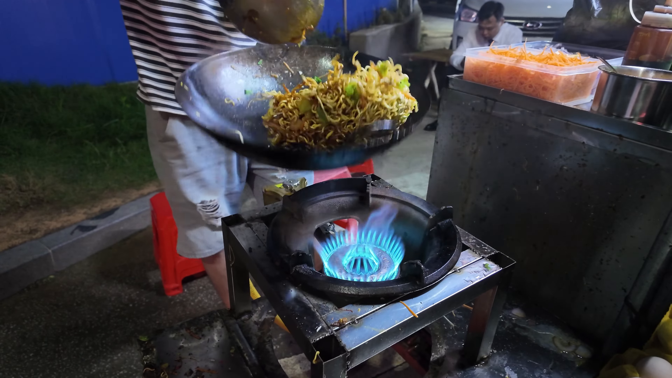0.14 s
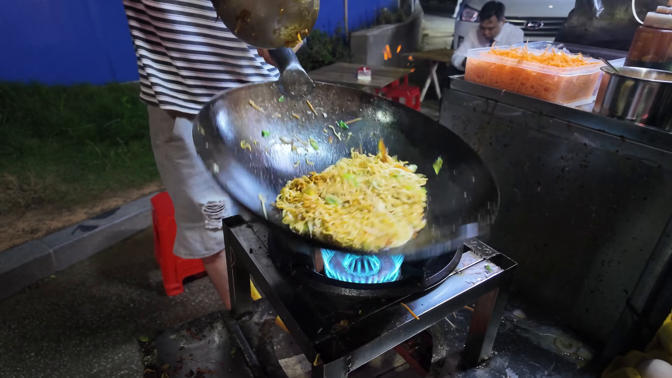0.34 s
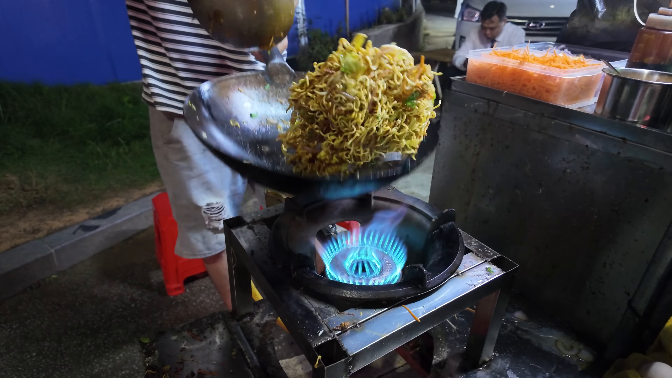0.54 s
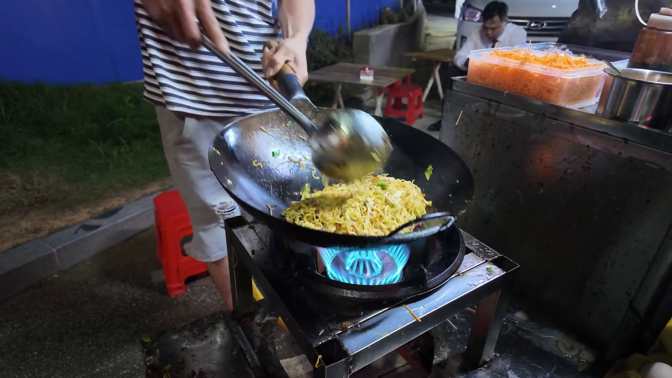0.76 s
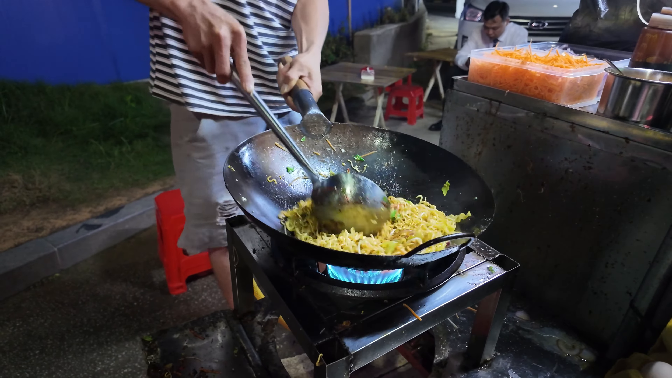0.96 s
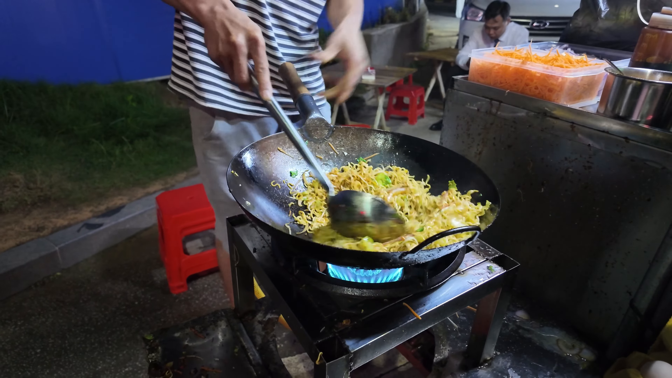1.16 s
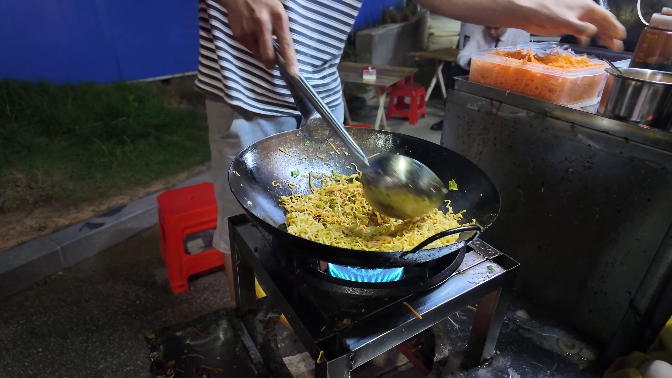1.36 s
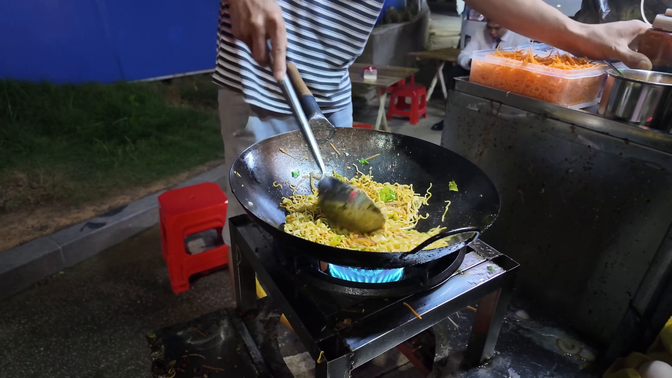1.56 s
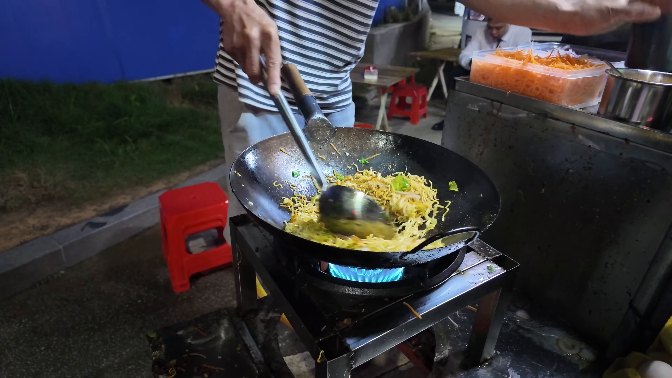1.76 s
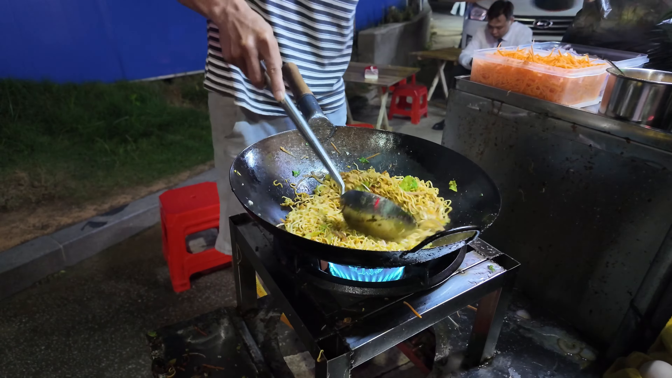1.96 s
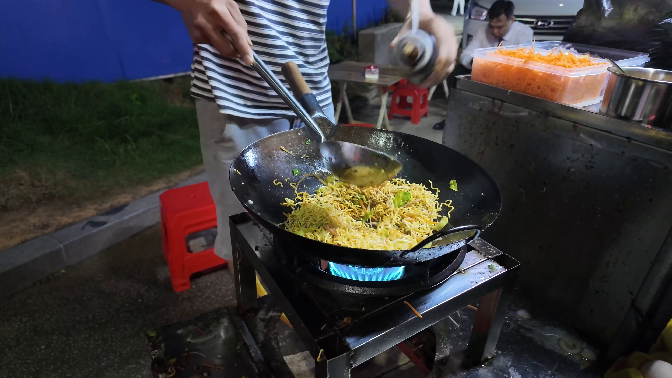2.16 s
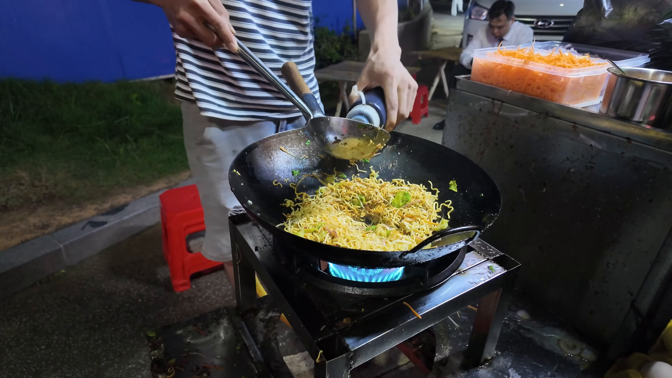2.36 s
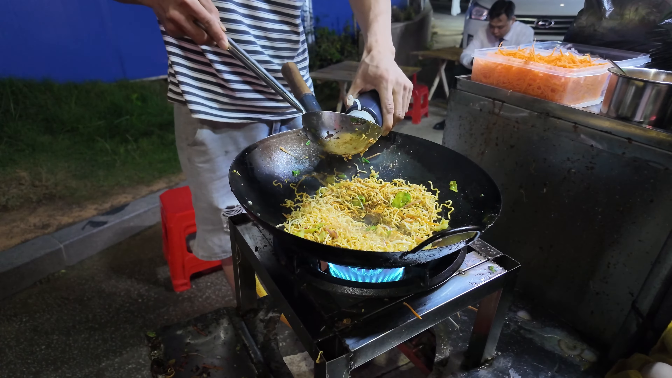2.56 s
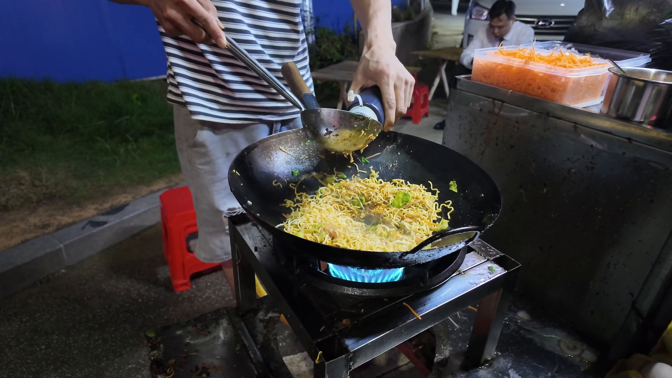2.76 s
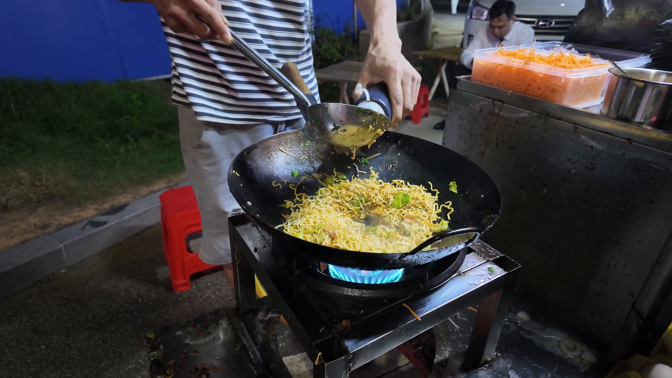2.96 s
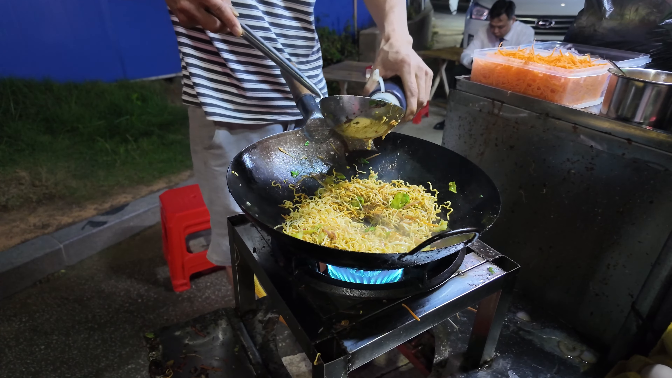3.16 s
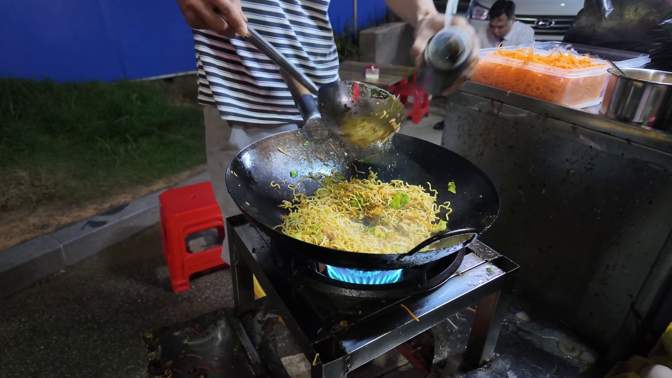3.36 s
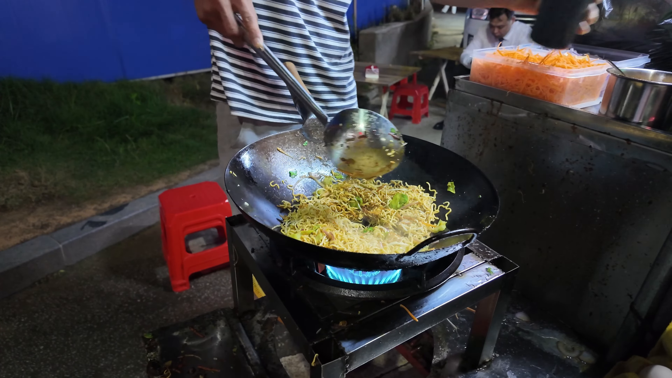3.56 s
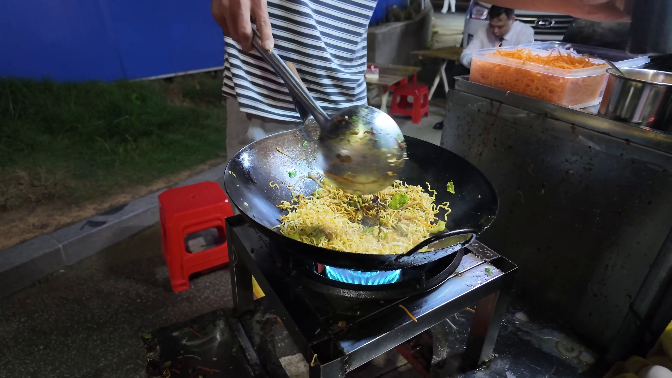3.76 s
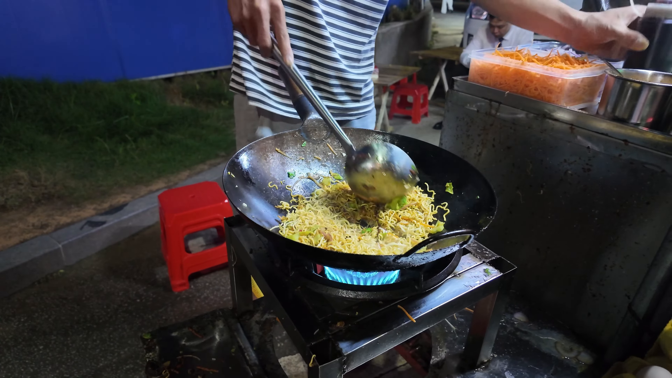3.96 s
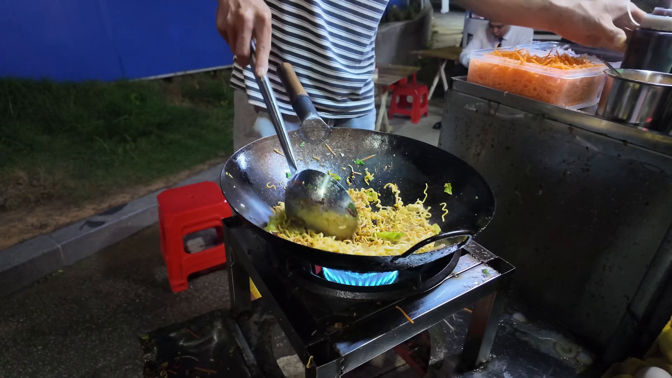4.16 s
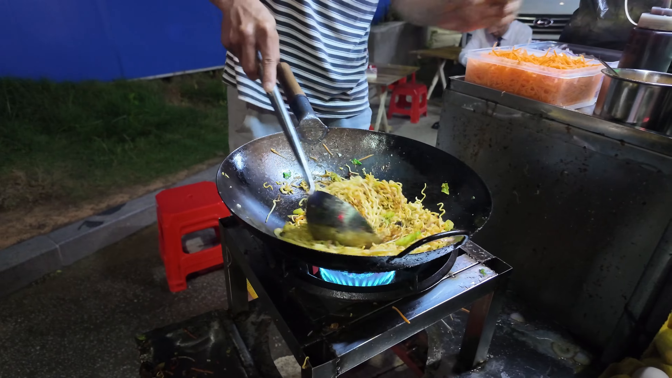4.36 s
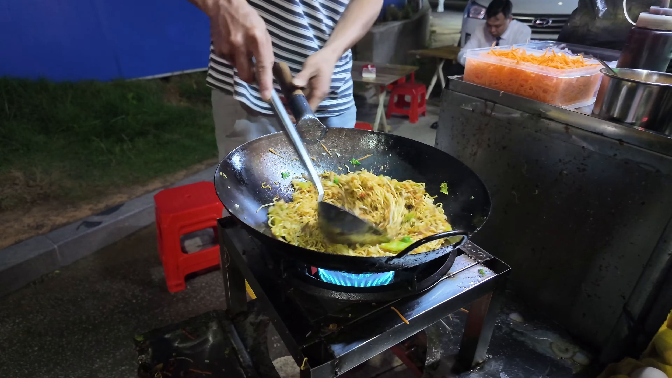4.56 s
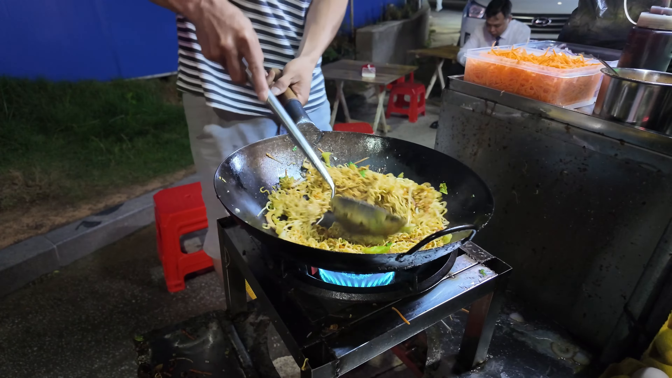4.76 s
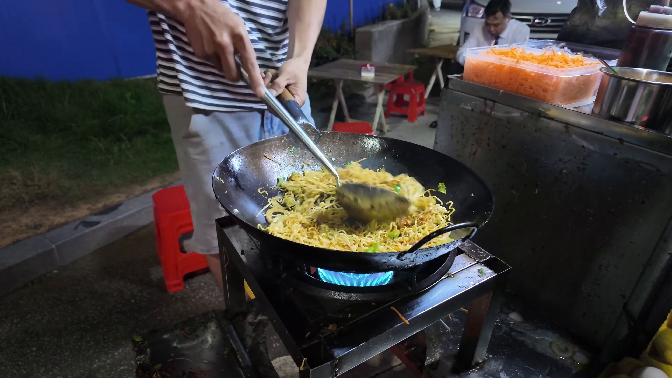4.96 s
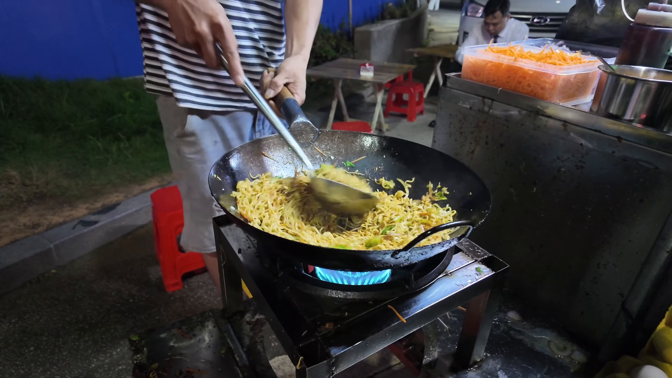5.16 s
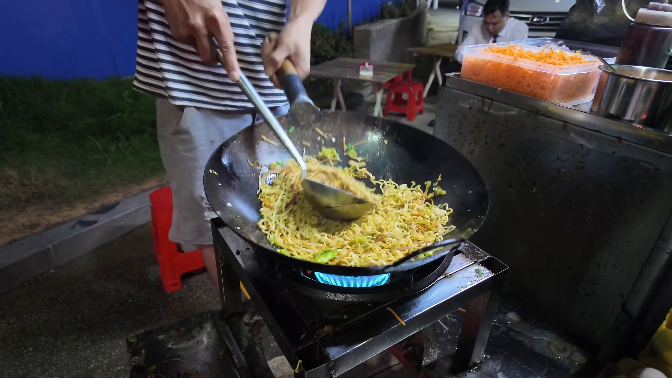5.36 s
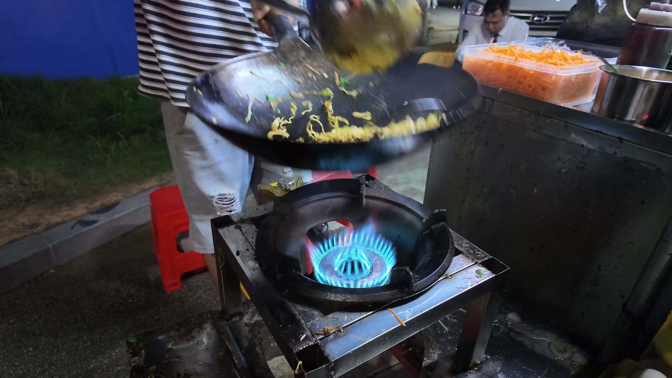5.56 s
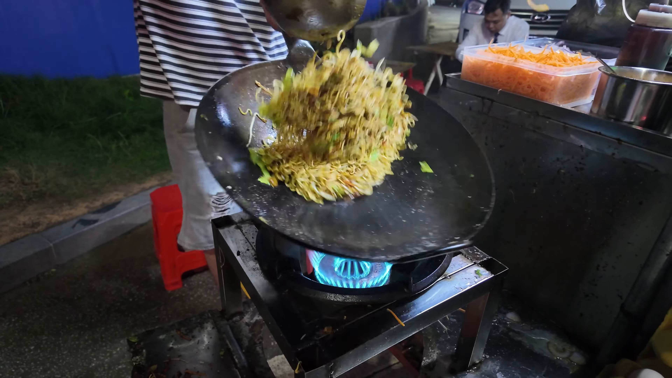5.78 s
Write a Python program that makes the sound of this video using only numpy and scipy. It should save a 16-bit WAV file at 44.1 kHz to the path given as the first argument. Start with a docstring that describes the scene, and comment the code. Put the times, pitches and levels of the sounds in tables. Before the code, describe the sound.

A wok clangs onto its stand and a ladle knocks and rasps through hissing, crackling noodles above a gas flame.

```python
"""Street stall wok

Noodles fry in a steel wok over a roaring gas burner: water boils off as hiss and wet crackle.
The sizzle drops while they are tossed into the air, fades as they rest and swells when the ladle
turns them. The wok clangs back onto its stand, the ladle knocks, rasps and squeals in it,
and a bottle thumps down on the counter."""
import sys
import numpy as np
from scipy import signal
from scipy.fft import rfft, irfft, next_fast_len
from scipy.io import wavfile
from scipy.ndimage import uniform_filter1d, map_coordinates

SR = 44100
rng = np.random.default_rng(int(sys.argv[2]) if len(sys.argv) > 2 else 0)


def dump_mix(stems):
    """Bounce the given channels to the path in sys.argv[1] as a 16-bit WAV at rate SR."""
    frames = np.atleast_2d(stems).T  # one column per channel
    limited = np.clip(frames, -1, 1)  # hard clip at full scale
    pcm = np.round(limited * 32767).astype(np.int16)
    wavfile.write(sys.argv[1], SR, pcm)


N = 256662

# EQ of the flame's roar: f/Hz, level/dB
ROAR_EQ = [(20, -83), (45, -18), (68, -3.5), (130, -3), (240, 1.5), (300, -5.5), (375, -19.5), (470, -8),
           (590, -19.5), (715, -6.5), (790, -12.5), (900, -6.5), (1200, -22), (2500, -32)]
# fader ride of the flame's hollow note: t/s, level/dB
HOLLOW_RIDE = [(0, -76), (2.1, -58), (2.8, -54), (3.3, -52.5), (3.65, -67), (4.6, -73), (5.1, -48.5),
               (5.8, -63)]
# EQ of the rattling counter: f/Hz, level/dB
COUNTER_EQ = [(25, -25), (70, -4), (200, 5.5), (350, -9.5), (600, -3), (950, -14), (1250, -23), (1600, -17),
              (4000, -27), (16000, -40)]
# the ladle pushes through the noodles, or the wok slides under them:
# t/s, length/s, sizzle surge/dB, scratch/dB, grind/dB
STROKES = [(0.027, 0.11, 0.5, -45, -45.5), (0.278, 0.021, 9, -37, -56), (0.358, 0.089, 4, -33.5, -50),
           (1.062, 0.067, -0.5, -29, -35.5), (1.384, 0.05, 0, -55, -62), (1.489, 0.056, -1, -33, -60),
           (1.577, 0.14, -2.5, -35, -59), (1.766, 0.049, 1, -39.5, -57), (1.878, 0.11, -0.5, -39, -56),
           (2.011, 0.073, 3.5, -35.5, -62), (4.08, 0.1, 7, -36.5, -53), (4.308, 0.11, 2.5, -36.5, -55),
           (4.582, 0.1, 3.5, -44.5, -67), (4.829, 0.084, 4, -37, -52), (5.051, 0.082, 3, -44, -48.5),
           (5.28, 0.065, 6.5, -50, -62), (5.454, 0.22, 4, -36, -48.5)]
# the ladle's edge squeals as it slides: t/s, length/s, f/Hz, level/dB
SQUEALS = [(1.076, 0.026, 2610, -21), (1.082, 0.017, 3410, -24.5), (1.083, 0.084, 4020, -28.5),
           (1.096, 0.048, 4420, -27.5), (1.099, .022, 5420, -27.5), (1.101, .025, 6800, -33)]
# modes of the ladle's cup and handle: f/Hz, level/dB, t60/s
LADLE_MODES = [(732, -4, 0.13), (795, 4, 0.057), (837, 6.5, 0.093), (870, 4, 0.042), (1132, 0, 0.14),
               (1575, -9.5, 0.17), (1669, -3, 0.091), (1703, -8, .1), (1820, -10, 0.079), (2360, 1, 0.093)]
# modes of the wok on its stand: f/Hz, level/dB, t60/s
WOK_MODES = [(186, -9, 0.52), (213.2, 1, 0.29), (225, 5, 0.41), (284, -7, 0.44), (337, -13, 0.28),
             (376, -19, 0.27), (437.6, -7, 0.35), (512, -14, 0.58), (678, -15, 0.4), (1070, -1.5, 0.16),
             (1100, -24, 0.16), (1250, -18, 0.12), (1606, -17, 0.37), (1920, -14, 0.17), (2210, -17, 0.19),
             (2320, -12.5, 0.12), (2370, -9, 0.14), (2620, -8.5, 0.19), (3270, -26, 0.11),
             (3260, -13, 0.09), (3440, -21, 0.089), (3650, -11, 0.091), (3680, -12.5, 0.12),
             (3840, -7.5, 0.11), (3950, -12, 0.15), (4130, -9, 0.15), (4700, -15.5, 0.14),
             (4800, -11.5, 0.1)]
# EQ of a crowd of short-lived steel modes: f/Hz, level/dB
CLATTER_EQ = [(300, 2), (620, -8), (850, -3), (1350, -13.5), (1700, -7.5), (3000, -6), (3700, 1),
              (5500, -10), (9000, -15), (16000, -21)]
# the wok drops or bumps onto its stand: t/s, level/dB, hardness/dB
STAND_HITS = [(0.108, -36.5, 0), (0.713, -16, 1), (0.722, -13.5, 0.5), (0.743, -17, -4), (4.634, -38, 0)]
# the ladle strikes the wok: t/s, level/dB, hardness/dB
LADLE_HITS = [(0.890, -17, -3), (0.898, -23, 3), (0.919, -28, -16), (0.950, -22.5, 4.5),
              (0.983, -23.5, -11), (0.988, -16, 3), (1.043, -25.5, -7), (1.065, -19.5, 1),
              (1.204, -29.5, 1.5), (1.252, -30, -5), (4.342, -40.5, -3), (4.775, -36.5, -3)]
# how hard the noodles fry while they lie on the steel: t/s, hiss/dB, wet crackle/dB
FRY_RIDE = [(0.0, -35, -41.5), (0.86, -37.5, -35), (0.9, -39, -35), (1.05, -36.5, -33.5),
            (1.33, -37.5, -39.5), (1.94, -38.5, -40.5), (3.62, -49.5, -54.5), (4.08, -46.5, -46),
            (4.3, -41, -38), (4.68, -36.5, -37), (5.48, -38, -39), (5.52, -39, -40.5)]
# the noodles are tossed: take-off t/s, landing t/s, settling time/s
TOSSES = [(0.102, 0.214, 0.14), (0.467, 0.682, 0.12), (5.601, 5.771, 0.033)]
# the oil spits: t/s, level/dB
OIL_SPITS = [(1.499, -25), (2.0263, -25.5), (2.8948, -24), (2.9685, -26.5), (3.0084, -27), (3.087, -30),
             (3.7607, -28.5)]
# EQ of the fine hiss: f/Hz, level/dB
HISS_EQ = [(500, -20.5), (1500, -19.5), (2800, -4.5), (3800, 2), (4600, 2.5), (6000, 2.5), (10000, 2),
           (12800, 0.5), (14500, -1.5), (16000, -5.5)]
# EQ of the wet crackle: f/Hz, level/dB
CRACKLE_EQ = [(150, -19), (400, -17), (900, -9), (1400, -4), (2200, 2), (3100, 1.5), (3850, 6), (4500, 2.5),
              (5500, -1.5), (9000, -20), (16000, -60)]
# EQ of the stereo side channel, wider toward the top: f/Hz, level/dB
SIDE_EQ = [(60, -37), (250, -16.5), (500, -10.5), (1000, -7.5), (2000, -8.5), (4000, -7), (8000, -3),
           (13000, 1)]


def amp(db):
    """Decibels to gain."""
    return 10 ** (np.asarray(db) / 20)


def unit(x):
    """x at rms 1."""
    return x / np.sqrt(np.mean(x ** 2) + 1e-20)


def unit_hit(x):
    """x with its first 20 ms at rms 1."""
    return x / np.sqrt(np.mean(x[:SR // 50] ** 2))


def curves(rows):
    """Fader rides: one value per sample for each column after the time."""
    times, *columns = np.transpose(rows)
    return [np.interp(np.arange(N) / SR, times, column) for column in columns]


def wobble(rate, size=N):
    """Smooth random modulation, rate knots a second."""
    knots = rng.standard_normal(int(size * rate / SR) + 4)
    return map_coordinates(knots, [np.arange(size) * rate / SR])


def eq(x, points):
    """x through a minimum-phase EQ drawn through points of f/Hz, level/dB."""
    size = 2 * next_fast_len(len(x) // 2 + 4096)
    hz, db = np.transpose(points)
    gain_db = np.interp(np.log(np.fft.rfftfreq(size, 1 / SR) + 1), np.log(hz), db)
    cepstrum = irfft(np.log(amp(gain_db))) * (1 + np.sign(size // 2 - np.arange(size)))
    cepstrum[0] /= 2
    return irfft(rfft(x, size) * np.exp(rfft(cepstrum)), size)[:len(x)]


def band(x, kind, hz):
    """x through a gentle low-, band- or high-pass."""
    return signal.sosfilt(signal.butter(2, hz, kind, fs=SR, output="sos"), x)


def add(track, s, sound):
    """Drop a sound onto the track at time s."""
    start = round(s * SR)
    track[start:start + len(sound)] += sound[:N - start]


def burst(t, t60):
    """Noise that dies away."""
    return rng.standard_normal(len(t)) * amp(-60 * t / t60)


def pops(rate, spread_db):
    """Random clicks, rate a second; spread_db makes a few stand out from the many."""
    size_db = spread_db * np.minimum(rng.exponential(size=N), 5)
    return unit((rng.random(N) < rate / SR) * rng.choice([-1, 1], N) * amp(size_db))


def ringing(modes, t, scatter_db):
    """A struck body's modes, at new strengths for each point of contact."""
    hz, db, t60 = np.transpose(modes)[:, :, None]
    struck_db = db + scatter_db * rng.standard_normal(hz.shape)
    return np.sum(amp(struck_db - 60 * t / t60) * np.sin(2 * np.pi * hz * t), axis=0)


def burner(roar_db=-44.5, flutter_db=0.58):
    """A bed of turbulent flame; the narrow gap under the wok adds a hollow note that comes and goes."""
    hollow_db, = curves(HOLLOW_RIDE)
    roar = amp(roar_db) * unit(eq(rng.standard_normal(N), ROAR_EQ))
    hollow = amp(hollow_db) * unit(band(rng.standard_normal(N), "bandpass", [760, 1000]))
    return amp(flutter_db * wobble(17)) * (roar + hollow)


def bottle(s=4.092, thump_hz=104, thump_t60=0.063, rattle_t60=0.16, rumble_t60=1.35):
    """A bottle lands on the counter: the broad panel thumps, rattles briefly and rumbles on."""
    out, t = np.zeros(N), np.arange(SR // 2) / SR
    soft_attack = 1 - np.exp(-t / 0.015)
    thump = -np.sin(2 * np.pi * thump_hz * t) * amp(-60 * t / thump_t60) * soft_attack
    rattle = unit(eq(rng.standard_normal(len(t)), COUNTER_EQ)) * amp(-60 * t / rattle_t60)
    rumble = unit(band(rng.standard_normal(len(t)), "bandpass", [55, 220])) * amp(-60 * t / rumble_t60)
    add(out, s, amp(-3) * thump + amp(-24) * rattle + amp(-40) * rumble)
    return out


def pressure(length, skew=0.73):
    """The force of one stroke swells and lets go; a skew below 1 presses hardest early."""
    return np.sqrt(np.abs(np.sin(np.pi * np.linspace(0, 1, int(length * SR)) ** skew)))


def rasps():
    """Ladle drags on wok, or wok on stand, in dense tiny slips: a bright scratch over a lower grind."""
    scratch_gain, grind_gain = np.zeros((2, N))
    for s, length, _, scratch_db, grind_db in STROKES:
        add(scratch_gain, s, amp(scratch_db) * pressure(length))
        add(grind_gain, s, amp(grind_db) * pressure(length))
    slips = pops(rate=1500, spread_db=0)
    scratch = unit(eq(slips, [(700, -31.5), (1300, -17), (1900, -8.5), (2600, -3.5),
                              (3900, -3.5), (6000, -8), (16000, -20)]))
    grind = unit(band(slips, "bandpass", [450, 1250]))
    return scratch_gain * scratch + grind_gain * grind


def squeals(pitch_jitter=0.039):
    """The ladle's edge sticks and slips, locking roughly onto one steel mode after another."""
    out = np.zeros(N)
    for s, length, hz, db in SQUEALS:
        t = np.arange(int(length * SR)) / SR
        rough_hz = hz * (1 + pitch_jitter * wobble(910, size=len(t)))
        phase = 2 * np.pi * np.cumsum(rough_hz) / SR
        grip = np.sqrt(np.abs(np.sin(np.pi * t / length))) * amp(2.3 * wobble(390, size=len(t)))
        add(out, s, amp(db - 1.5) * grip * np.sin(phase))
    return out


def clang(boom_db, knock_db, clank_db, clash_db):
    """Steel on steel: the food-damped bowl booms and clashes; the ladle knocks and clanks."""
    t = np.arange(SR // 2) / SR
    # the noodles bounce in the bowl, so its ring stutters
    bouncing = amp(2.7 * wobble(44, size=len(t)) * (2 - np.exp(-t / 0.02)))
    bowl = bouncing * ringing(WOK_MODES, t, scatter_db=5.5)
    ladle = unit_hit(ringing(LADLE_MODES, t, scatter_db=6.5)) + 1.03 * unit_hit(burst(t, t60=0.11))
    stand_rattle = unit_hit(band(burst(t, t60=0.17), "bandpass", [70, 400]))
    clatter = unit_hit(eq(burst(t, t60=0.17), CLATTER_EQ))
    boom = unit_hit(band(unit_hit(bowl) + 0.62 * stand_rattle, "lowpass", 680))
    knock = unit_hit(band(ladle, "lowpass", 930))
    clank = unit_hit(band(ladle, "bandpass", [1200, 2600]))
    clash = unit_hit(unit_hit(band(bowl, "highpass", 780)) + 0.93 * clatter)
    return amp(boom_db) * boom + amp(knock_db) * knock + amp(clank_db) * clank + amp(clash_db) * clash


def hits(cues, boom_db, knock_db, clank_db, clash_db):
    """A track of clangs from one base mix; harder hits bring out the clank and the clash."""
    out = np.zeros(N)
    for s, db, hard_db in cues:
        add(out, s, amp(db) * clang(boom_db, knock_db, clank_db + hard_db, clash_db + hard_db))
    return out


def wok_clangs():
    """The stand mostly rings the bowl; a blow of the ladle rings both bowl and ladle."""
    stand = hits(STAND_HITS, boom_db=-1, knock_db=-19.5, clank_db=-23, clash_db=-4)
    ladle = hits(LADLE_HITS, boom_db=-2, knock_db=-5.5, clank_db=-7.5, clash_db=-8.5)
    return band(stand + ladle, "highpass", 106)  # an open bowl radiates little deep bass


def frying_levels(linger_s=0.065, lift_s=0.12, duck_db=-20, drying_db=-1):
    """Hiss and crackle rides in dB: strokes press wet noodles onto hot steel, tosses lift them off."""
    hiss_db, crackle_db = curves(FRY_RIDE)
    t = np.arange(N) / SR
    surge_db, airborne = np.zeros((2, N))
    for s, length, db, _, _ in STROKES:
        add(surge_db, s, db * pressure(length))
    for leave, land, settle in TOSSES:
        airborne += np.clip((t - leave) / lift_s, 0, 1) * np.clip(1 - (t - land) / settle, 0, 1)
    contact_db = uniform_filter1d(surge_db, int(linger_s * SR)) + duck_db * airborne
    # scraps left on the steel dry out, so the crackle ducks further than the hiss
    return hiss_db + contact_db, crackle_db + contact_db + drying_db * airborne


def spits():
    """Single drops burst in the hot oil as bright ticks."""
    out, t = np.zeros(N), np.arange(SR // 20) / SR
    for s, db in OIL_SPITS:
        tick = eq(burst(t, t60=0.013), [(800, -29), (3800, 3.5), (7000, -5), (16000, -6)])
        add(out, s, amp(db) * tick)
    return out


def spatter(rate=50, t60=0.024, trim_db=-8):
    """Larger bubbles burst in short sprays that follow the hiss ride."""
    hiss_db, _ = frying_levels()
    decay = amp(-60 * np.arange(SR // 20) / SR / t60)
    envelope = signal.fftconvolve(np.abs(pops(rate, spread_db=1.5)), decay)[:N]
    return amp(hiss_db + trim_db) * unit(eq(envelope * rng.standard_normal(N), HISS_EQ))


def sizzle():
    """Water boils off the steel as fine hiss; wet noodles pressed onto it crackle lower."""
    hiss_db, crackle_db = frying_levels()
    sputter = amp(1.12 * wobble(35) + 0.65 * wobble(220))  # bubbles burst in clumps
    hiss = unit(eq(pops(rate=3000, spread_db=3) + 1.95 * rng.standard_normal(N), HISS_EQ))
    crackle = unit(eq(pops(rate=1800, spread_db=1) + 1.1 * rng.standard_normal(N), CRACKLE_EQ))
    steam_db = 2 * hiss_db + 31  # the fiercer the boil, the brighter its steam
    steam = unit(band(rng.standard_normal(N), "bandpass", [11000, 15500]))
    return sputter * (amp(hiss_db + 2.5) * hiss + amp(crackle_db - 1.5) * crackle + amp(steam_db) * steam)


def cooking():
    """The bus of flame, frying and rasps, with fresh noise on each call."""
    return burner() + sizzle() + spatter() + rasps()


def scene():
    """Flame and frying spread wide; the spot effects sit centre and echo off the steel stall."""
    bed = cooking()
    spots = spits() + wok_clangs() + squeals() + bottle()
    walls = burst(np.arange(SR // 10) / SR, t60=0.038)
    echo = signal.fftconvolve(spots + 0.29 * bed, walls / np.linalg.norm(walls))[:N]
    mid = bed + spots
    side = eq(0.78 * cooking() + 1.2 * echo, SIDE_EQ)  # off-centre bubbles reach each ear differently
    return np.array([mid + side, mid - side])


def record(dry, top_hz=15900):
    """A brick-wall low-pass on the master."""
    size = next_fast_len(N + SR // 4)
    passband = np.fft.rfftfreq(size, 1 / SR) < top_hz
    return irfft(rfft(dry, size) * passband, size)[:, :N]


dry = scene()
out = record(dry)
dump_mix(out)
```